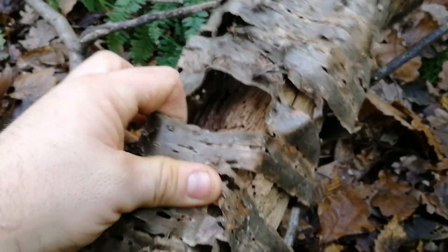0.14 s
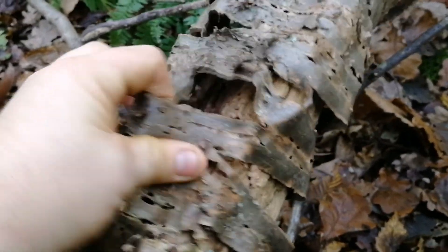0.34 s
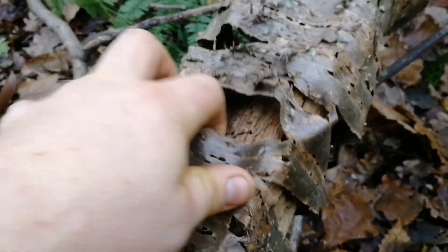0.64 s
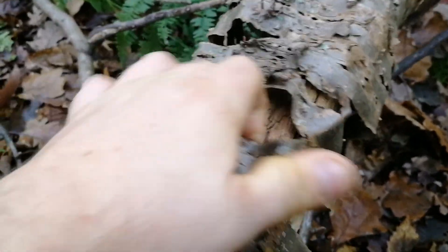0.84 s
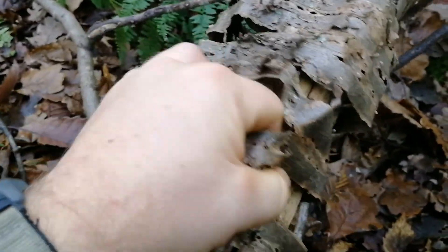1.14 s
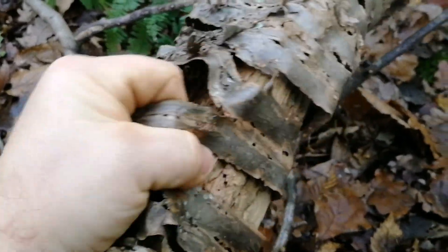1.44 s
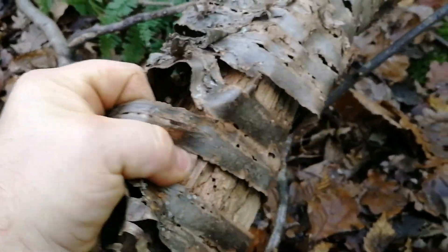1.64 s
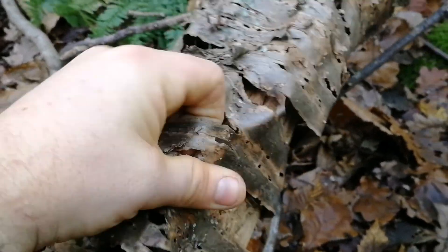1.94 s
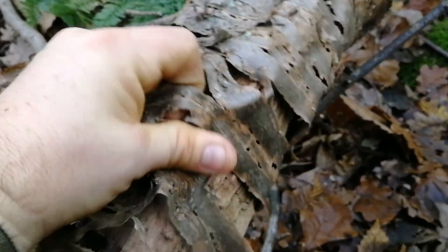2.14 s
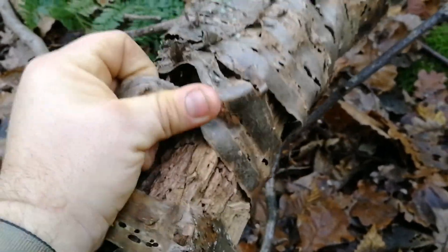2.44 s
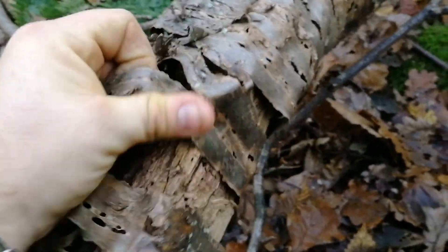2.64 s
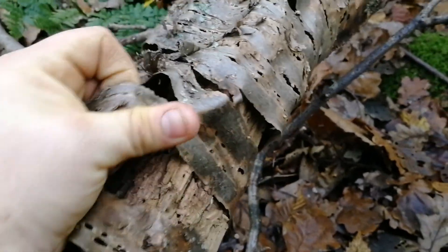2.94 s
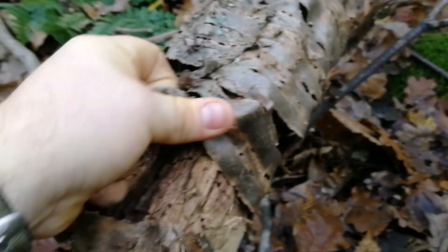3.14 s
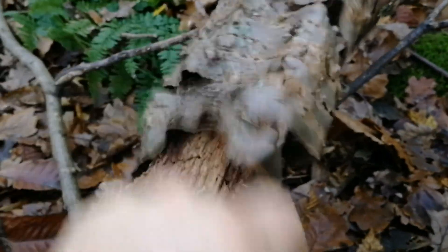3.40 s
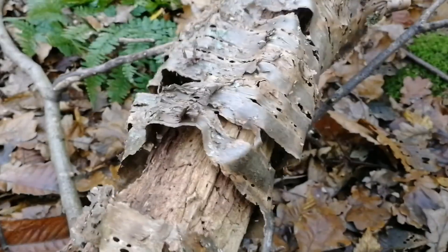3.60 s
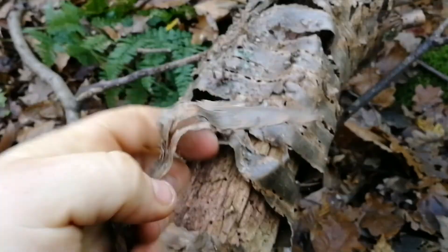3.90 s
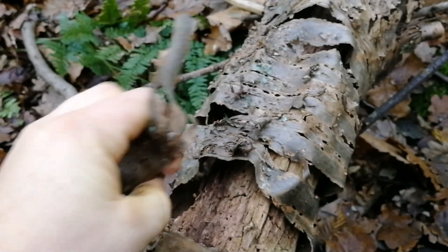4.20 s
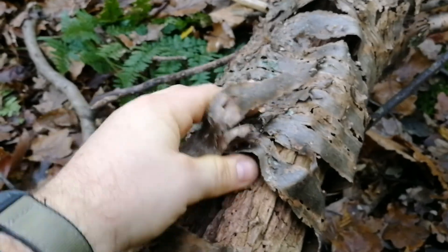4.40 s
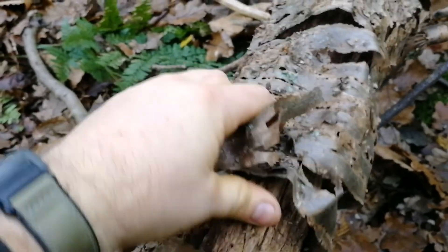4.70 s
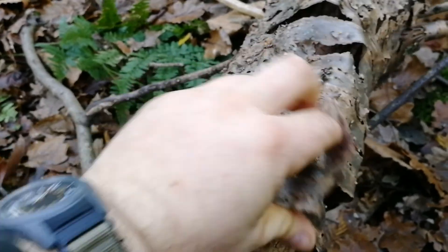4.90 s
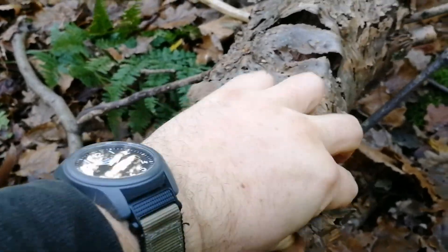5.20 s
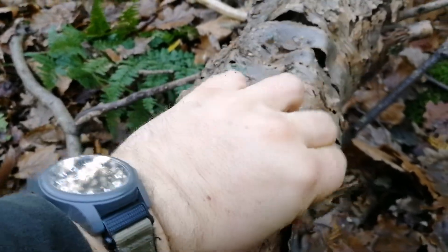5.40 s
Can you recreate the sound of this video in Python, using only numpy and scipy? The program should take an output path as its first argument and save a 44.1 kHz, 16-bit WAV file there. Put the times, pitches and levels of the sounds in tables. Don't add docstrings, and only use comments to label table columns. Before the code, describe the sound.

Close, crisp cracks and rustles of brittle bark being pried and peeled from soft dead wood, over quiet outdoor hiss and low hum.

```python
import sys
import numpy as np
from scipy import signal
from scipy.io import wavfile
from scipy.ndimage import uniform_filter1d

SR = 44100
rng = np.random.default_rng(int(sys.argv[2]) if len(sys.argv) > 2 else 0)


def digitize_waveform(pressure):
    field = np.atleast_2d(pressure).T
    bounded = np.clip(field, -1, 1)
    quanta = np.round(bounded * 32767).astype(np.int16)
    wavfile.write(sys.argv[1], SR, quanta)


def makeup_ratio(level_db):
    decades = np.asarray(level_db, float) / 20
    return 10 ** decades


N = 244755

# (frequency [Hz], level per Hz [dB])
AIR_COLOUR = [(20, -67), (40, -2), (65, -0.5), (140, -9.5), (260, -10.5), (420, -17.5), (640, -19.5),
              (950, -13), (2000, -23.5), (8000, -33.5), (14000, -27.5), (17000, -76)]
AIR_DB = -65
# (frequency [Hz], likeness [-1 to 1])
AIR_LIKENESS = [(30, 0.91), (70, 0.996), (130, 0.87), (240, 0.85), (950, -0.3), (3770, 0.054),
                (15000, -0.38)]
# (frequency [Hz], width [Hz], level [dB])
ENGINE_TONES = [(65.2, 4.9, -65.5), (99, 6, -69), (131.5, 4.6, -72.5), (203, 3.1, -83)]
# (time [s], level [dB])
TRAFFIC_SWELL = [(0.0, -65), (0.06, -56), (0.34, -70), (0.45, -57.5), (1.24, -60), (1.31, -67),
                 (2.02, -56.5), (2.16, -68.5), (2.24, -55.5), (2.43, -68), (2.54, -57.5), (3.52, -66.5),
                 (5.55, -66.5)]
# (time [s], peak [dB], pitch [Hz])
LOG_SHIFTS = [
    (.428, -48, 170),
    (1.062, -61, 166),
    (2.2525, -36.5, 170),
    (3.512, -44, 198),
]
# (time [s], peak [dB], pitch [Hz])
LOG_THUDS = [(0.205, -41, 315), (0.246, -43.5, 234), (0.427, -47, 186), (1.061, -45.5, 202),
             (1.357, -52.5, 285), (2.249, -40, 310), (2.257, -48, 189), (3.145, -46.5, 214),
             (3.254, -49, 235), (3.273, -41, 290), (3.291, -38, 347), (3.307, -51, 196), (3.441, -42, 220),
             (3.509, -40, 271), (3.547, -48.5, 211), (3.578, -47.5, 216), (3.619, -49, 294),
             (4.929, -54, 190)]
# (time [s], peak [dB], pitch [Hz])
SHEET_KNOCKS = [(1.062, -30.5, 1030), (2.15, -35.5, 1050), (2.952, -42, 880), (3.198, -37.5, 1050),
                (3.292, -33, 784), (3.579, -40.5, 880), (3.822, -31.5, 1270), (5.107, -49.5, 950),
                (5.139, -42.5, 980), (5.276, -44.5, 1100), (5.3645, -23, 1045), (5.369, -41.5, 830)]
# (start [s], hold [s], fine rustle [dB], coarse relative to fine [dB])
RUB_STROKES = [(0.0, 0.0013, -40, 1.5), (0.218, 0.0041, -43.5, 3.5), (0.25, 0.022, -66, 4),
               (0.305, 0.29, -47.5, 3.5), (0.637, 0.052, -44.5, 3), (0.68, 0.3, -47.5, -1),
               (0.962, 0.021, -53, -8), (1.052, 0.083, -54.5, 10.5), (1.15, 0.092, -55.5, -1),
               (1.29, 0.03, -45.5, -2), (1.402, 0.019, -40.5, 1), (1.585, 0.14, -49, -6),
               (1.765, 0.17, -55, 0.5), (1.866, 0.13, -45.5, -1), (2.033, 0.17, -49.5, -3.5),
               (2.265, 0.056, -46, 1), (2.326, .08, -58.5, -10), (2.422, 0.0062, -47, 5),
               (2.488, 0.17, -55.5, -1), (2.689, 0.12, -48, 1), (2.857, .06, -56, 4),
               (2.931, 0.051, -40.5, -7.5),
               (3.05, 0.22, -44, 3), (3.255, 0.061, -42, 9), (3.36, .08, -64, -15),
                (3.478, 0.005, -46, 2.5), (3.514, 0.11, -37.5, 1), (3.665, .04, -50, 2),
                (3.721, 0.026, -41.5, 3), (3.806, 0.025, -43, 0.5), (3.9, 0.055, -44, 3),
                (4.05, 0.092, -53.5, -0.5), (4.357, 0.051, -53.5, -2), (4.461, 0.021, -35.5, -11.5),
                (4.591, 0.069, -43.5, -1.5), (4.682, .1, -51.5, 3), (4.874, 0.028, -39.5, -1.5),
                (4.961, 0.012, -46.5, -3), (5.047, 0.023, -73, -11), (5.084, 0.15, -54.5, -2),
                (5.2, 0.077, -46.5, -4.5), (5.349, 0.012, -53, 5.5), (5.379, 0.03, -45.5, 2.5),
                (5.5, 0.042, -49.5, -2)]
RISE_DB_PER_S, FALL_DB_PER_S, REST_DB = 503, 316, -61.5
# (frequency [Hz], sharpness Q [-], level [dB])
CURL_HOLLOW = [
    (950, 2.5, -10),
    (2050, 4.0, -19),
]
CURL_FROM_S = 4.4
# (time [s], level [dB], ring [Hz])
FIBRE_TICKS = [(0.113, -39, 4000), (0.1795, -31, 2350), (0.315, -39, 4170), (0.3323, -20.5, 5100),
               (0.339, -27.5, 8000), (0.3616, -22, 5460), (0.432, -25, 6000), (0.607, -29.5, 3270),
               (0.664, -28.5, 5530), (0.687, -28, 5600), (0.763, -30, 3400), (0.7808, -25, 3600),
               (0.8674, -19, 5850), (0.9198, -28.5, 4570), (1.061, -21.5, 4300), (1.083, -34, 4930),
               (1.0897, -25.5, 7750), (1.1323, -34, 7300), (1.1412, -29.5, 3980), (1.264, -26, 8900),
               (1.2776, -34, 8000), (1.3182, -25, 2840), (1.4859, -33, 3640), (1.548, -23.5, 5400),
               (1.5969, -35.5, 6950), (1.611, -32.5, 8100), (1.681, -25.5, 3860), (1.889, -24.5, 9000),
               (1.912, -30, 7000), (1.9467, -32.5, 6900), (1.9742, -33, 3700),
               (2.0966, -22.5, 6840), (2.1488, -27.5, 1910), (2.288, -30, 6500), (2.3264, -26, 2300),
                 (2.3325, -28.5, 2020), (2.422, -22, 7650), (2.452, -41, 5400), (2.555, -38, 4960),
                 (2.7092, -35, 6700), (2.7164, -29.5, 6500), (2.749, -37.5, 7300), (3.074, -26, 3800),
                 (3.077, -24, 6600), (3.092, -33, 8200), (3.13, -21, 3470), (3.1986, -24, 3660),
                 (3.242, -26, 2930), (3.316, -24, 4300), (3.338, -24, 5430), (3.3474, -23, 4300),
                 (3.352, -21.5, 3500), (3.4523, -19, 3220), (3.473, -29, 5400), (3.5817, -24.5, 4300),
               (3.663, -39, 4300), (3.73, -33, 3000), (3.742, -23, 8800), (3.787, -25, 7760),
                 (3.7904, -26, 4260), (3.8246, -28, 1970), (3.8973, -18, 3600), (3.9232, -23, 4770),
                 (4.041, -37.5, 3170), (4.199, -34, 8500), (4.2136, -35, 4300), (4.4527, -27, 7100),
                 (4.524, -32, 6300), (4.707, -36, 4500), (4.796, -36, 4050), (4.879, -30, 6060),
                 (5.0, -36.5, 8100), (5.032, -29, 2160), (5.1626, -36.5, 7650), (5.2396, -32, 5500),
                 (5.291, -35, 4800), (5.43, -24.5, 2320), (5.4903, -31.5, 5660)]
# (time [s], level [dB], ring [Hz])
FURTHER_TICKS = [(0.2175, -29, 4390.0), (0.3447, -37, 5430), (0.365, -36, 7840.0), (0.4007, -38, 2890.0),
                 (0.4799, -36.5, 4370), (0.6502, -37, 3750.0), (0.7684, -35, 4650.0), (0.8094, -37, 3760),
                 (0.8185, -40, 4180.0), (0.8624, -36, 2460), (0.9328, -34.5, 2110.0), (0.9644, -42, 2380),
                 (1.155, -40, 7190.0), (1.2507, -40, 3400.0), (1.4717, -36.5, 8180.0),
                 (1.4965, -40, 3140.0), (1.642, -36, 3680), (1.6577, -35, 3880.0), (1.7281, -42.5, 7620.0),
                 (1.971, -27, 3700), (1.98, -32, 4200), (2.1588, -37, 3400.0), (2.166, -23.5, 5630),
                 (2.1727, -31, 7670.0), (2.213, -36, 5340.0), (2.2931, -38, 2330.0), (2.395, -40, 2970.0),
                 (2.4224, -30, 7580.0), (2.4529, -27.5, 1980.0), (2.6514, -47, 8480.0),
                 (2.699, -41, 3190.0), (2.7672, -37, 4740.0), (2.9523, -36, 4480.0),
                 (2.9906, -36.5, 8310.0), (2.9997, -40, 4390.0), (3.0539, -37, 2260), (3.116, -33, 2150.0),
                 (3.1921, -28, 3530.0), (3.218, -32, 3830.0), (3.3135, -21, 3620.0), (3.395, -40, 8270.0),
                 (3.427, -73, 3270.0), (3.4926, -52, 2570), (3.6061, -24.5, 8700.0), (3.6144, -34, 4350.0),
                 (3.6187, -40, 2220), (3.623, -34, 7450.0), (3.6305, -42, 8660), (3.7555, -30, 5000.0),
                 (3.795, -29.5, 4740.0), (3.807, -34, 3620.0), (3.8743, -37, 3830.0),
                 (4.1857, -37, 8270.0), (4.209, -51, 8350.0), (4.4792, -36, 2410.0), (4.883, -26.5, 6400),
                 (5.0312, -29, 4330), (5.0832, -47, 3880.0), (5.4261, -39, 3400.0), (5.4982, -34, 3450)]
# (time [s], length [s], level [dB], ring [Hz])
FLAKE_DRAGS = [(0.208, 0.011, -32, 7000), (0.637, 0.03, -42.5, 8000), (1.151, 0.012, -52, 7500),
               (2.799, 0.017, -45, 5840), (3.143, 0.015, -30, 6500), (3.145, 0.015, -29, 3650),
               (3.211, 0.016, -45, 7800), (3.599, 0.03, -38, 7700), (4.098, 0.031, -46.5, 4000),
               (4.104, 0.06, -59, 7000), (4.523, 0.0085, -39.5, 6500), (4.789, 0.014, -44.5, 5960),
               (5.041, 0.0082, -28, 8100), (5.282, 0.017, -45.5, 5700), (5.424, .013, -33.5, 2880)]
STRAY_COUNT = 160
STRAY_OVER_RUB_DB, STRAY_SPREAD_DB, STRAY_LO_HZ, STRAY_HI_HZ = 9, 12, 2500, 8500
# (time [s], bright crack [dB], sheet relative to crack [dB], log
# relative to crack [dB], ring [Hz])
BARK_SNAPS = [(0.1999, -15, 6, -9, 5150), (0.209, -11, 3, -17.5, 7700), (0.251, -5.5, -4, -22.5, 2480),
              (0.2611, -8.5, -1, -21, 8400), (0.3973, -20, -2, -37, 3070), (0.4252, -10, -3.5, -17, 3000),
              (1.1086, -11.5, -11.5, -31, 3600), (1.3608, -15, 8.5, -9, 6150),
              (1.5047, -14.5, -1.5, -38, 7500), (1.668, -22, 6.5, -23, 2390), (1.8836, -22, -33, -55, 5700),
              (2.115, -18.5, 8.5, -13.5, 2150), (2.167, -16, -21, -28, 5160),
              (2.1793, -13.5, -11, -27, 7700), (2.2267, 1, -5.5, -25.5, 3040),
              (2.2447, -15.5, -27, -26, 5340), (2.2514, -4, -4.5, -25, 8600), (2.26, -25, 5, -10, 6600),
              (2.3488, -7, 0, -31, 4800), (2.437, -11.5, -12, -22, 4600), (2.4424, -10, -21, -15, 4370),
              (2.446, -14.5, 0.5, -16, 5550),
              (3.0536, -21.5, -7.5, -12.5, 2180), (3.124, -14, 6.5, -19, 5330),
              (3.1484, -7, 1.5, -22.5, 3640), (3.173, -33.5, 13.5, 0, 4470),
              (3.2525, -26.5, 9.5, -10, 4530), (3.2776, -12.5, -3.5, -12.5, 3400),
              (3.2941, -22, 11.5, -17, 3750), (3.309, -16, -7, -16, 3050), (3.4058, -11.5, 7.5, -15, 2520),
              (3.4442, -32, 16, 2.5, 2650), (3.5008, -18, 4, -6, 4570), (3.5105, 1, -3, -25.5, 5640),
              (3.517, -12, 4.5, -22, 4400), (3.551, -6.5, -3.5, -23.5, 4300), (3.6094, -22, 4, -16, 3530),
              (3.6444, -16, 1.5, -18.5, 7220), (3.7143, -25, 3, -13, 3240), (3.9299, -21, -5.5, -10, 3050),
              (3.947, -21.5, 3.5, -23, 3130), (3.991, -12.5, -4, -21.5, 4630), (4.6491, -20, 2, -17, 7700),
              (4.657, -19.5, 3, -12, 8100), (4.9185, -20, 2, -23, 7300), (5.0418, -5, -6.5, -23, 1820)]
# (time [s], left over right [dB])
BREAK_PLACE = [(0.21, 9.5), (0.251, 20), (0.262, 1), (0.43, 9.5), (1.5, 6.5), (1.67, 6.5), (1.88, 15),
               (2.12, 5), (2.26, 1.5), (2.35, 1.5), (2.44, 10.5), (3.41, 10.5), (3.51, 3), (3.64, 12.5),
               (3.72, 13), (4.0, -1.5), (5.04, 9.5)]
# (frequency [Hz], level [dB])
LEFT_COLOUR = [(120, -21), (300, -23.5), (600, 8.5), (1200, -4), (2400, -1.5), (4400, -4), (6200, 3.5),
               (8000, 9.5), (10000, -1.5), (13000, -11), (16000, -12.5)]
# (frequency [Hz], level [dB])
RIGHT_COLOUR = [(120, -36.5), (300, 3), (600, -4), (1200, -9.5), (2400, 0.5), (4400, -2), (6200, 0),
                (8000, -4), (10000, -10.5), (13000, -19), (16000, -16)]
BARK_LAG, THUD_LAG = 9, 30


def evened(x):
    return x / np.sqrt(np.mean(x ** 2) + 1e-20)


def read(points, hz):
    f, value = np.transpose(points)
    return np.interp(np.log(hz + 1), np.log(f + 1), value)


def add(mix, s, sound):
    part = mix[..., max(round(s * SR), 0):][..., :sound.shape[-1]]
    part += sound[..., :part.shape[-1]]


def band(x, lo_hz, hi_hz):
    sections = signal.butter(2, [lo_hz, hi_hz], "bandpass", fs=SR, output="sos")
    return signal.sosfilt(sections, x) * np.sqrt(SR / 2 / (hi_hz - lo_hz))


def colour(x, points):
    log_gain = np.log(makeup_ratio(read(points, abs(np.fft.fftfreq(4096, 1 / SR)))))
    taps = np.fft.ifft(np.exp(np.conj(signal.hilbert(log_gain)))).real[:1024]
    return signal.oaconvolve(x, taps)[:N]


def air():
    hz = np.fft.rfftfreq(2048, 1 / SR)
    a, b, c, d = rng.standard_normal((N // 512 + 5, len(hz), 4)).T
    same = np.clip(read(AIR_LIKENESS, hz), -1, 1)[:, None]
    left = a + 1j * b
    right = same * left + np.sqrt(1 - same ** 2) * (c + 1j * d)
    spectrum = np.array([left, right]) * makeup_ratio(read(AIR_COLOUR, hz))[:, None]
    hiss = signal.istft(spectrum, nperseg=2048, noverlap=1536)[1][:, :N]
    return makeup_ratio(AIR_DB) * evened(hiss)


def traffic():
    t, out = np.arange(N) / SR, np.zeros(N)
    for hz, width_hz, level_db in ENGINE_TONES:
        noise = rng.standard_normal(N) + 1j * rng.standard_normal(N)
        drift = signal.lfilter([1], [1, -np.exp(-np.pi * width_hz / SR)], noise)
        steadier = drift / np.sqrt(abs(drift))
        out += makeup_ratio(level_db) * evened((steadier * np.exp(2j * np.pi * hz * t)).real)
    return out * makeup_ratio(np.interp(t, *np.transpose(TRAFFIC_SWELL)) + 62.0)


def bumps(rows, cycles, right):
    out, t = np.zeros((2, N)), np.arange(3000) / SR
    for s, peak_db, hz in rows:
        tones = np.sin(2 * np.pi * hz * t) + 0.44 * np.sin(2 * np.pi * 1.52 * hz * t)
        swell = hz * t * np.exp(1 - hz * t / cycles) / cycles
        add(out, s, makeup_ratio(peak_db) * tones * swell * np.array([[1], [right]]))
    return out


def log_thuds():
    left, right = bumps(LOG_THUDS, cycles=0.97, right=0.78)
    return np.array([left, np.roll(right, THUD_LAG)])


def rubbing(coarse):
    t = np.arange(0, N + 32, 32) / SR
    level_db = np.full(len(t), float(REST_DB))
    for s, hold, fine_db, relative_db in RUB_STROKES:
        before, after = np.maximum(s - t, 0), np.maximum(t - s - hold, 0)
        away_db = RISE_DB_PER_S * before + FALL_DB_PER_S * after
        level_db = np.maximum(level_db, fine_db + coarse * relative_db - away_db)
    return np.interp(np.arange(N) / SR, t, level_db)


def flakes(coarse, edges_hz, per_s, spread_db, smooth, patchy_db):
    clumps = evened(uniform_filter1d(rng.standard_normal(N), size=250))
    out = 0
    for lo_hz, hi_hz in zip(edges_hz, edges_hz[1:]):
        patch = evened(uniform_filter1d(uniform_filter1d(rng.standard_normal(N), size=1500), size=1500))
        size = makeup_ratio(spread_db * np.minimum(rng.exponential(1, N), 3))
        struck = rng.random(N) < per_s * makeup_ratio(3 * clumps) / SR
        grains = signal.lfilter([1], [1, -np.exp(-1 / (0.0012 * SR))], size * struck)
        near, other = rng.standard_normal((2, N))
        noise = np.array([near, 0.6 * np.roll(near, BARK_LAG) + 0.8 * other])
        friction = smooth * makeup_ratio(1.6 * clumps)
        drive = noise * (friction + evened(grains)) * makeup_ratio(patchy_db * patch)
        out = out + band(drive, lo_hz, hi_hz) * np.sqrt(hi_hz - lo_hz)
    return makeup_ratio(rubbing(coarse) - 6) * evened(out)


def creak():
    return makeup_ratio(-19) * flakes(coarse=True, edges_hz=[150, 380], per_s=41, spread_db=7, smooth=1.0, patchy_db=3.0)


def mottle(x, depth_db):
    z = signal.stft(x, nperseg=256)[2]
    patches = uniform_filter1d(rng.standard_normal(z.shape[1:]), size=3, axis=0)
    patches = uniform_filter1d(patches, size=12, axis=1)
    return signal.istft(z * makeup_ratio(depth_db * evened(patches)), nperseg=256)[1][:, :N]


def ring(x, hz, q):
    return signal.lfilter(*signal.iirpeak(min(hz, 15000), q, SR), x) * np.sqrt(SR * q / (np.pi * hz))


def rustle():
    fine = flakes(coarse=False, edges_hz=[4300, 6500, 8900, 16300], per_s=360, spread_db=2,
                  smooth=0.46, patchy_db=0.5)
    coarse = flakes(coarse=True, edges_hz=[1100, 2200, 4300], per_s=350, spread_db=7.0,
                    smooth=1.0, patchy_db=-1.5)
    hollow = sum(makeup_ratio(db) * ring(coarse, hz, q) for hz, q, db in CURL_HOLLOW)
    hollow = hollow * (np.arange(N) > CURL_FROM_S * SR)
    return mottle(fine + coarse + hollow, depth_db=2.2)


def burst(t, t60, shared):
    near, other = rng.standard_normal((2, len(t)))
    pair = np.array([near, shared * np.roll(near, BARK_LAG) + np.sqrt(1 - shared ** 2) * other])
    fall_db = -60 * t / t60
    body = makeup_ratio(fall_db - 7) + makeup_ratio(3 + 5 * fall_db)
    tail = makeup_ratio(-26 + 0.5 * fall_db)
    shape = np.minimum(t / 0.0005, 1) ** 2 * (body + tail)
    return evened(pair * shape) * np.sqrt(np.mean(shape ** 2))


def place(s, width):
    left_db = np.clip(np.interp(s, *np.transpose(BREAK_PLACE)) - 5, -12, 12)
    return makeup_ratio(width * left_db * np.array([[1], [-1]]))


def strays():
    when, size, pitch = rng.random((STRAY_COUNT, 3)).T
    level_db = rubbing(0)[(when * N).astype(int)] + STRAY_OVER_RUB_DB - STRAY_SPREAD_DB * size
    return list(zip(when * N / SR, level_db, STRAY_LO_HZ * (STRAY_HI_HZ / STRAY_LO_HZ) ** pitch))


def ticks():
    rings, cracks, t = np.zeros((2, N)), np.zeros((2, N)), np.arange(700) / SR
    further_ticks = [(s, db + 0.5, hz) for s, db, hz in FURTHER_TICKS]
    for s, level_db, hz in FIBRE_TICKS + further_ticks + strays():
        flake = ring(burst(t, 0.015, 0.44), hz, 2.5)
        add(rings, s - 0.0006, makeup_ratio(level_db - 0.96) * place(s, 0.4) * flake)
        add(cracks, s - 0.0006, makeup_ratio(level_db - 2.5) * place(s, 0.05) * burst(t, 0.0093, 0.33))
    for s, length, level_db, hz in FLAKE_DRAGS:
        stroke = np.hanning(round(length * SR))
        scrape = stroke * rng.standard_normal((2, len(stroke)))
        add(rings, s, makeup_ratio(level_db) * ring(scrape, hz, 4.0))
    return rings + band(cracks, 1630, 15900)


def snaps():
    layers, t = np.zeros((4, 2, N)), np.arange(1000) / SR
    for s, crack_db, sheet_db, log_db, hz in BARK_SNAPS:
        crack, sheet, log = burst(t, 0.007, 0.095), burst(t, 0.013, 0.46), burst(t, 0.037, 0.58)
        flake = ring(burst(t, 0.0073, 0.43), hz, 8.6)
        flake_db = sheet_db if hz < 4300 else -3
        level_db = crack_db + np.array([1.5, sheet_db - 6.0, log_db - 0.5, flake_db + 4.0])
        parts = np.array([crack, sheet, log, flake]) * makeup_ratio(level_db)[:, None, None]
        add(layers, s - 0.0004, parts * place(s, 0.25))
    cracks, sheets, logs, rings = layers
    return band(cracks, 6500, 13240) + band(sheets, 2180, 5980) + band(logs, 890, 2030) + rings


def scene():
    bark = band(snaps() + ticks(), 750, 21000)
    bark = bark + bumps(SHEET_KNOCKS, cycles=0.9, right=0.6) + rustle()
    ports = np.array([colour(bark[0], LEFT_COLOUR), colour(bark[1], RIGHT_COLOUR)])
    log = log_thuds() + bumps(LOG_SHIFTS, cycles=0.49, right=0.78)
    return ports + creak() + log + air() + traffic()


def low_pass(x):
    return signal.sosfilt(signal.butter(12, 16950, fs=SR, output="sos"), x)


def record(dry):
    rounded = 0.85 * np.tanh(dry / 0.85)
    limited = signal.oaconvolve(rounded, signal.firwin(255, 16500, fs=SR)[None], "same")
    return low_pass(limited)


dry = scene()
out = record(dry)
digitize_waveform(out)
```